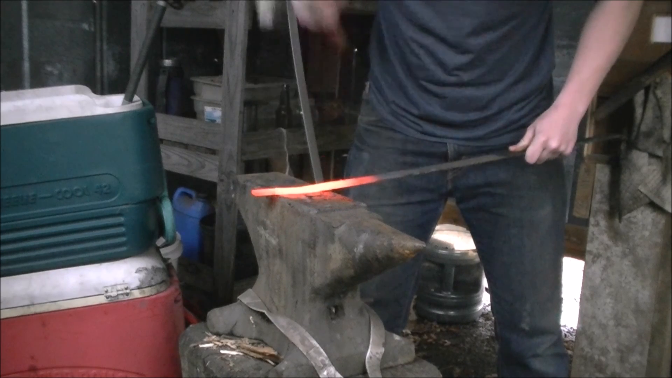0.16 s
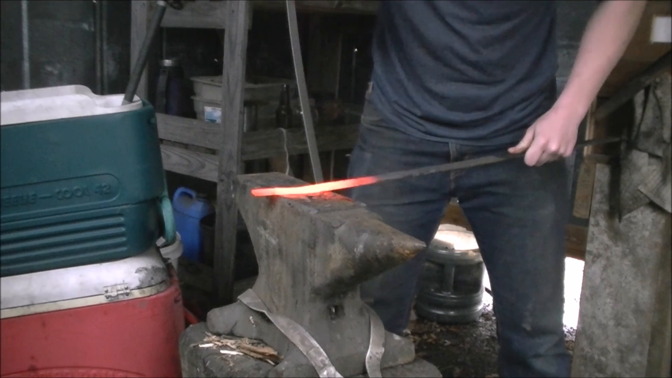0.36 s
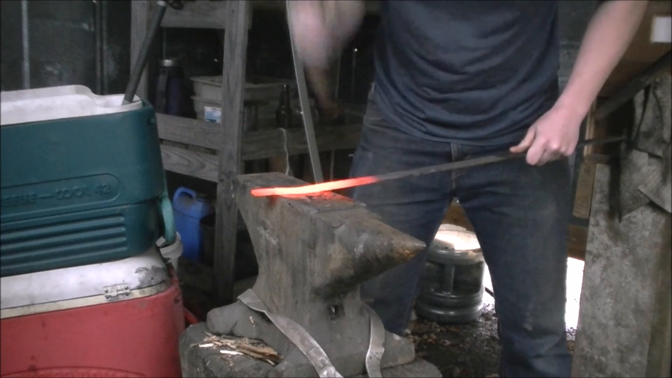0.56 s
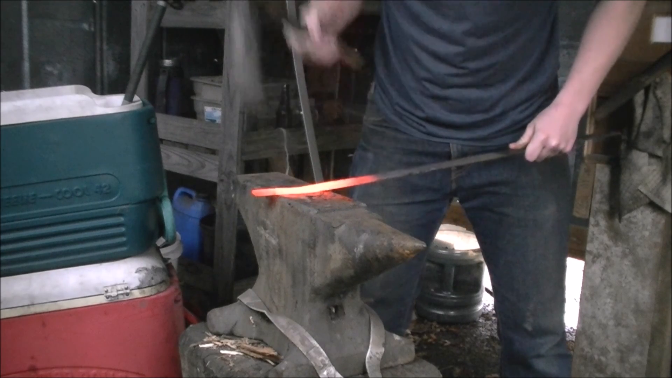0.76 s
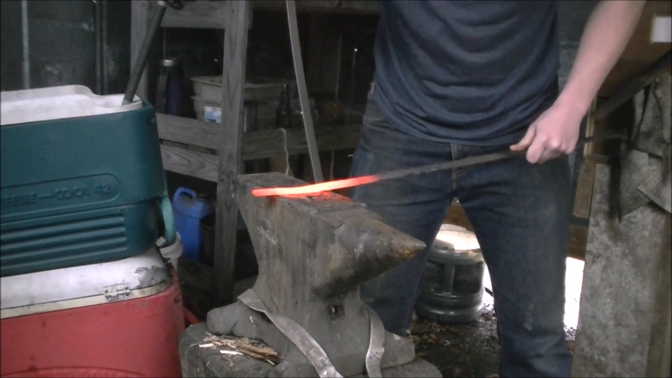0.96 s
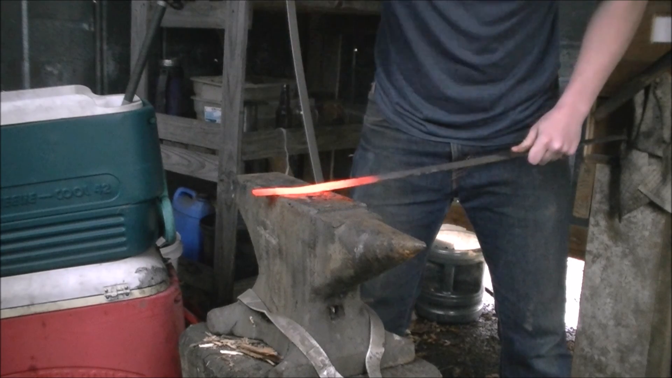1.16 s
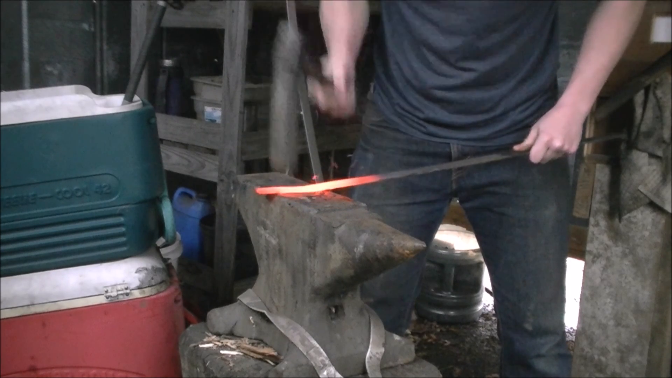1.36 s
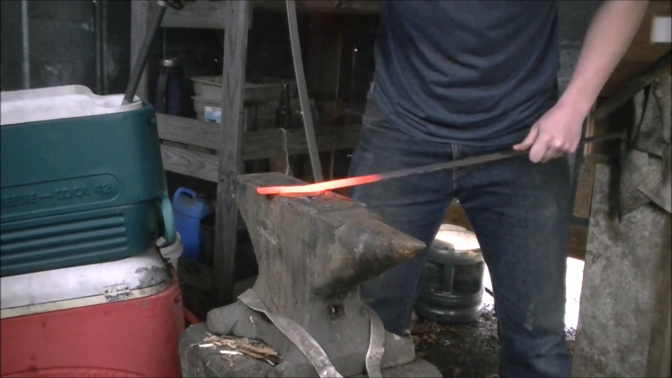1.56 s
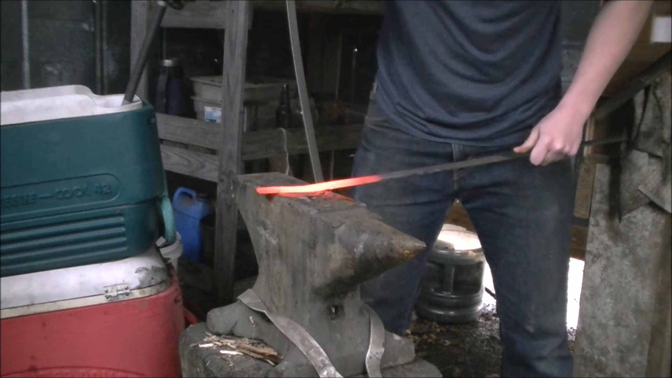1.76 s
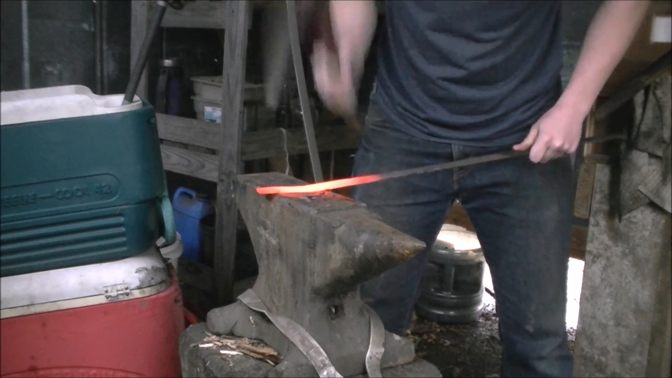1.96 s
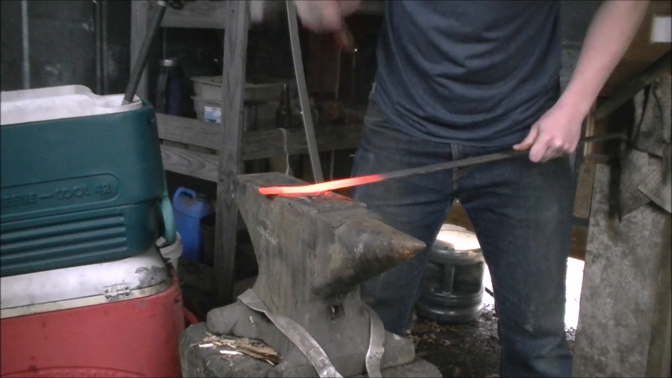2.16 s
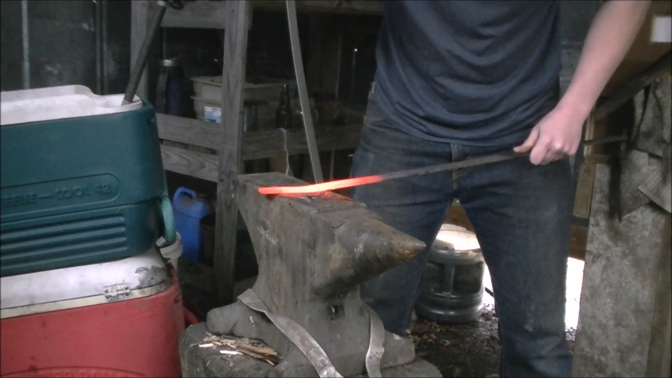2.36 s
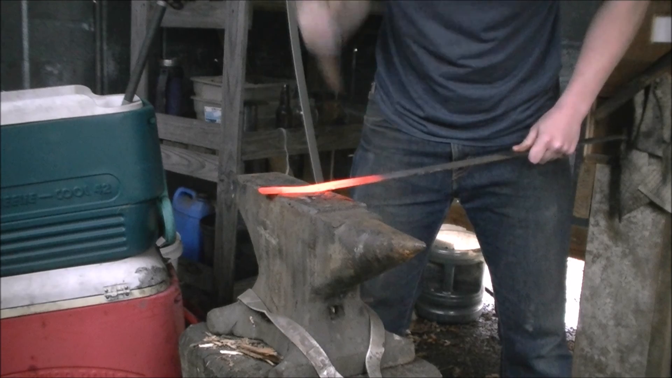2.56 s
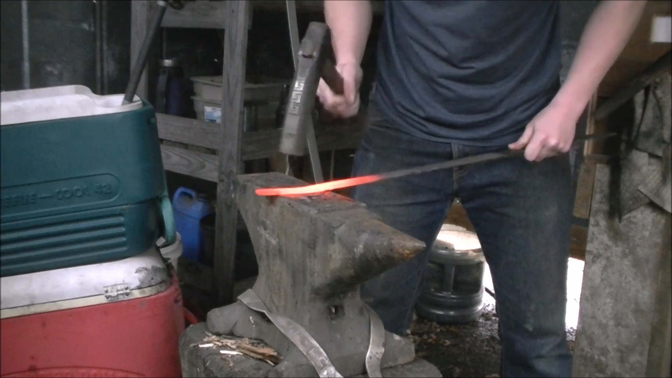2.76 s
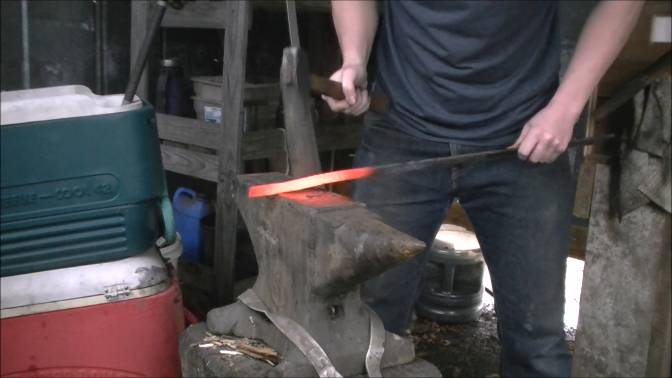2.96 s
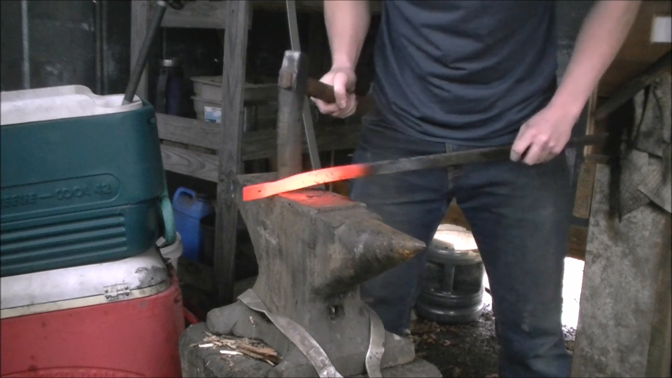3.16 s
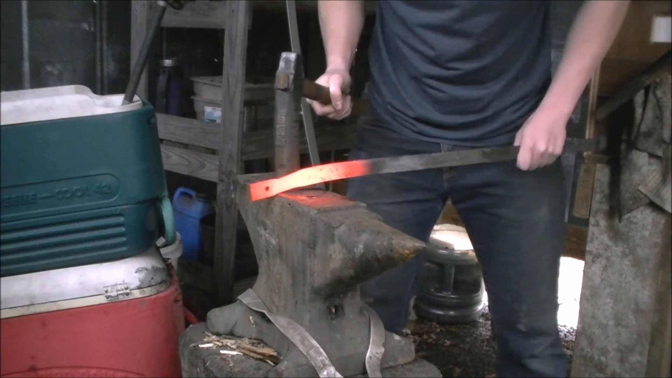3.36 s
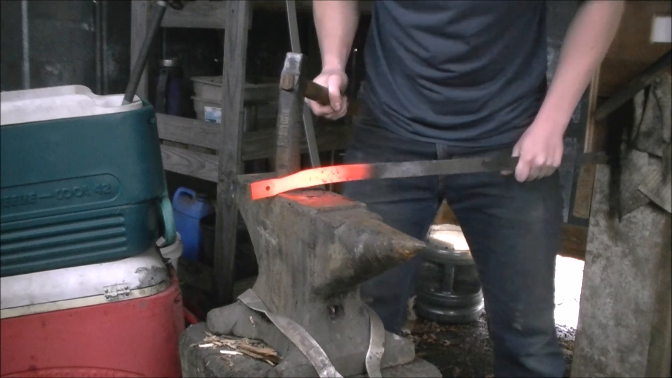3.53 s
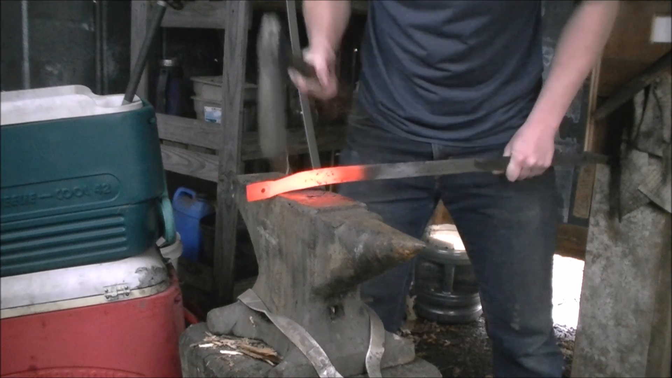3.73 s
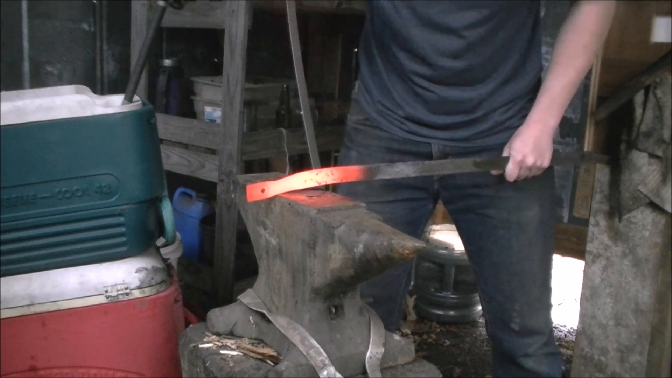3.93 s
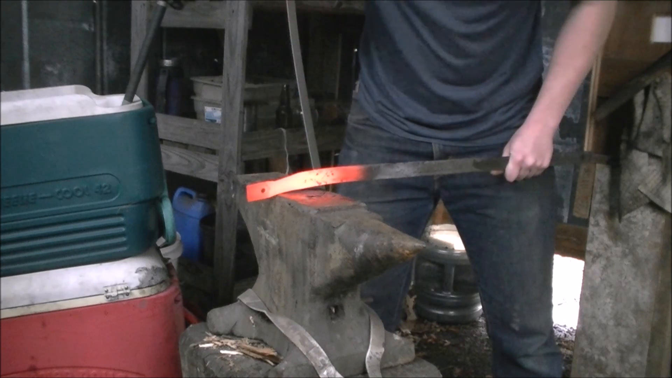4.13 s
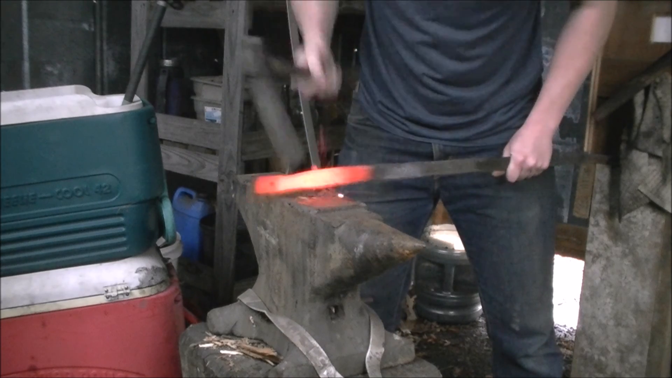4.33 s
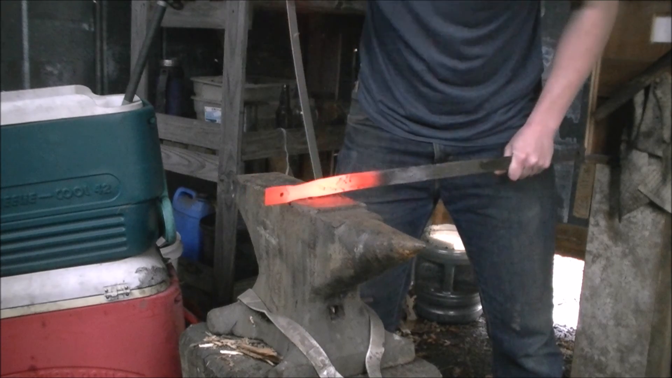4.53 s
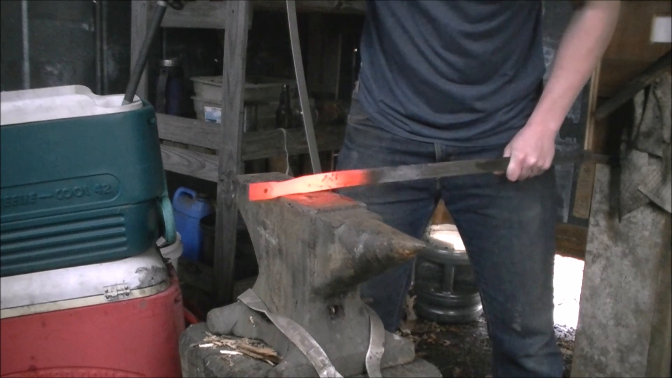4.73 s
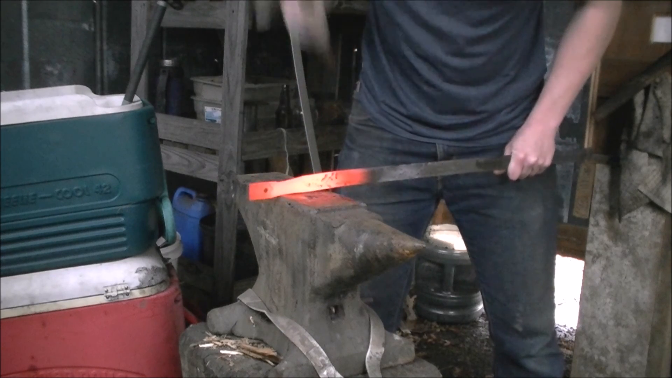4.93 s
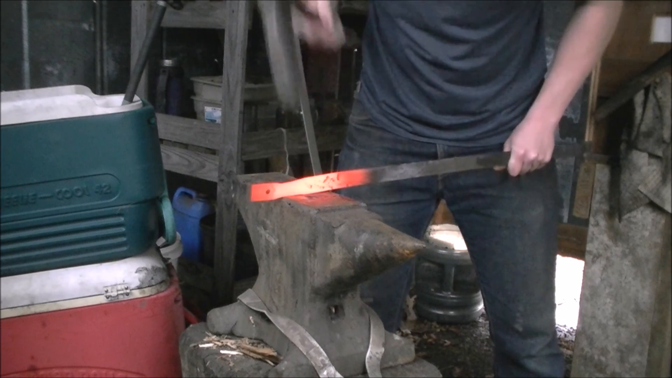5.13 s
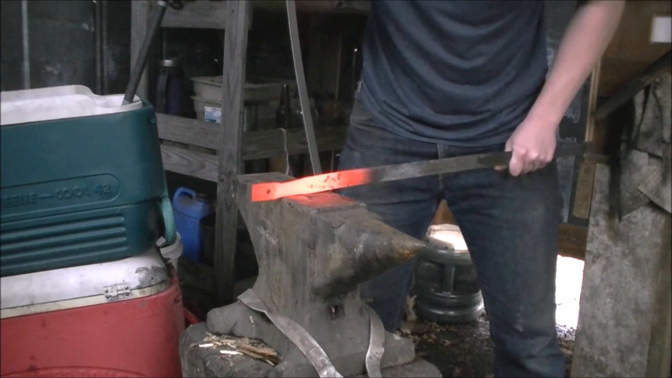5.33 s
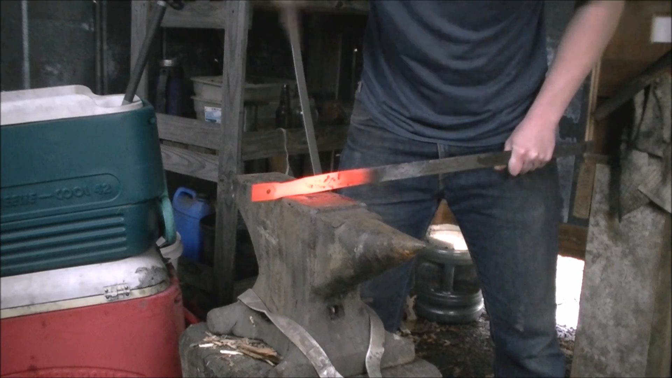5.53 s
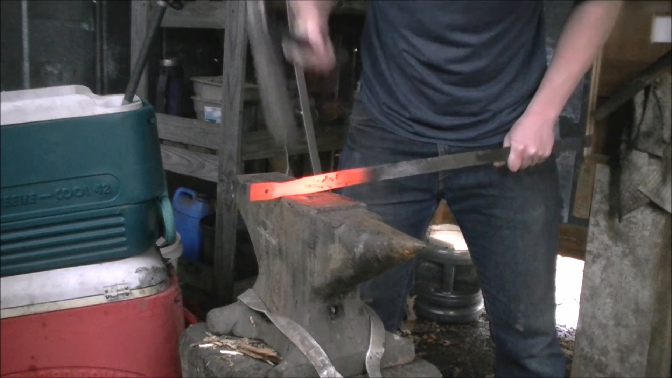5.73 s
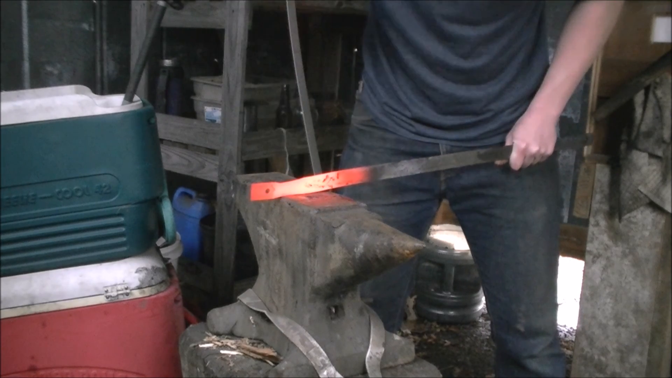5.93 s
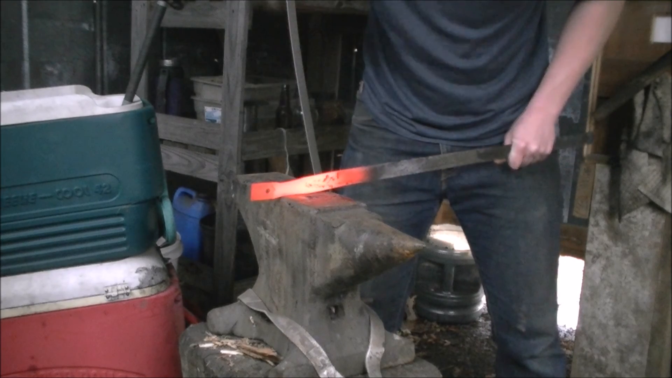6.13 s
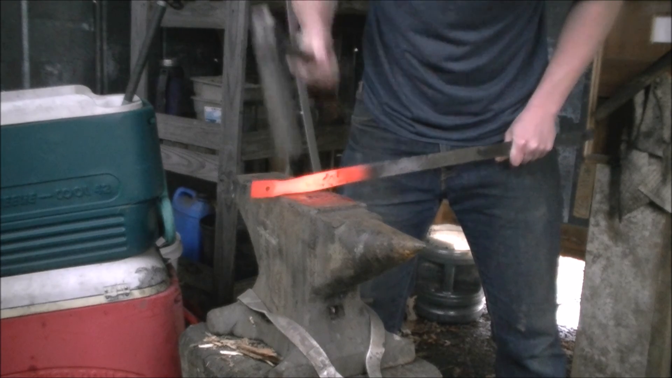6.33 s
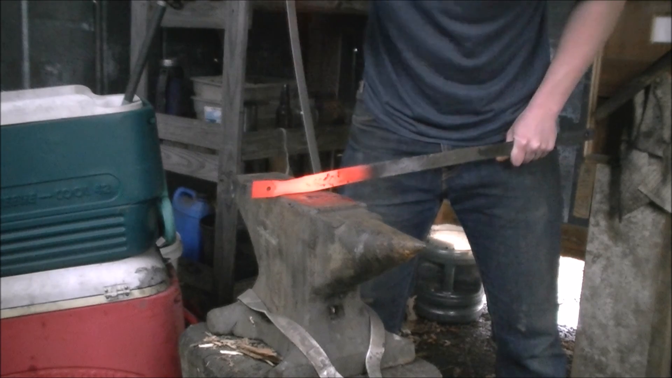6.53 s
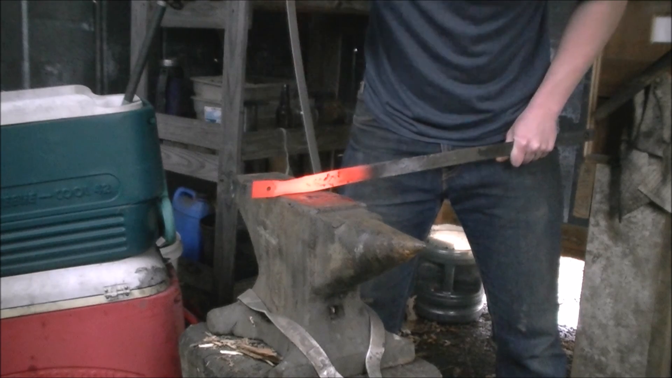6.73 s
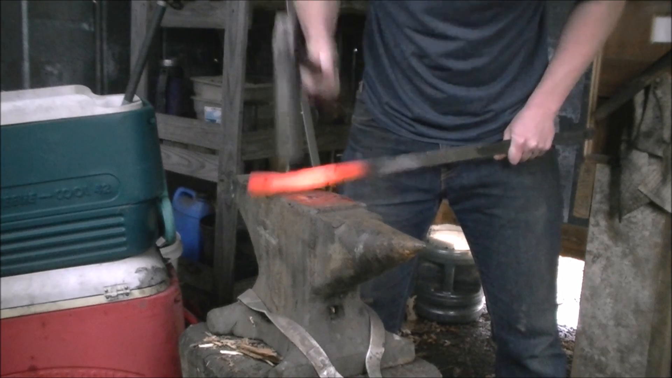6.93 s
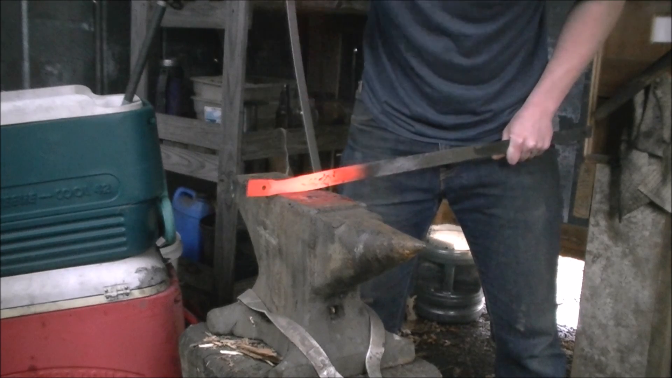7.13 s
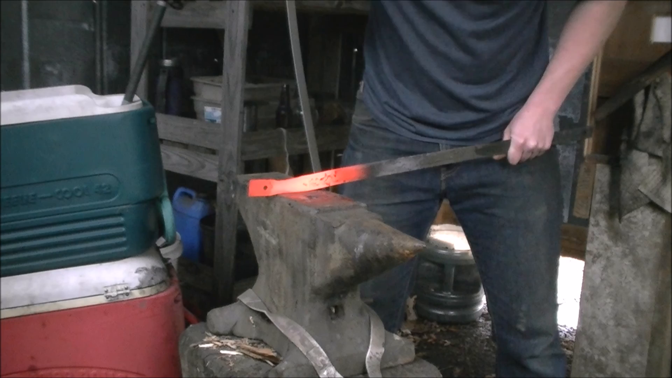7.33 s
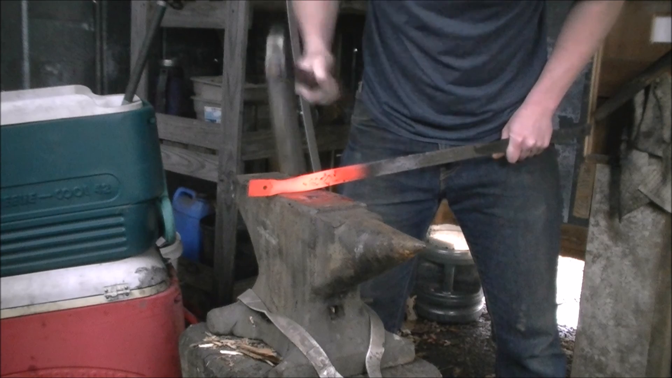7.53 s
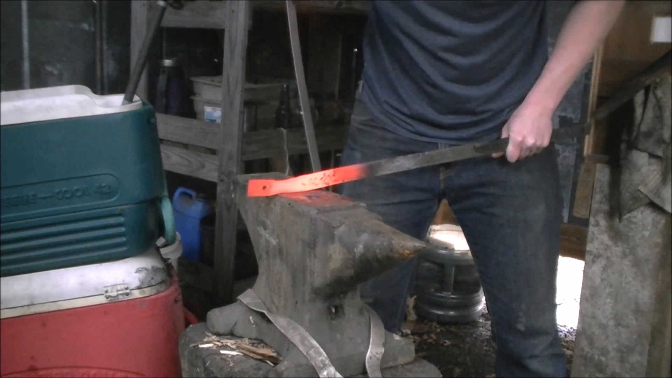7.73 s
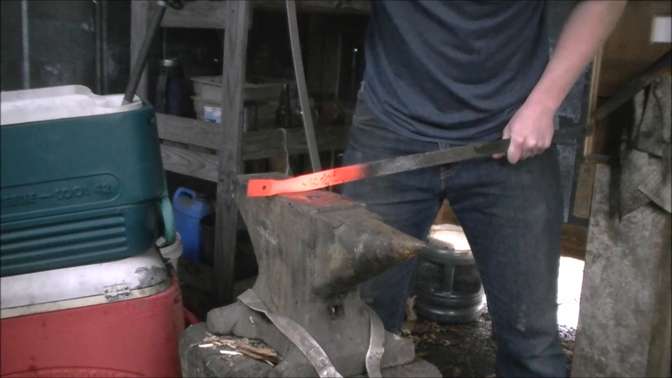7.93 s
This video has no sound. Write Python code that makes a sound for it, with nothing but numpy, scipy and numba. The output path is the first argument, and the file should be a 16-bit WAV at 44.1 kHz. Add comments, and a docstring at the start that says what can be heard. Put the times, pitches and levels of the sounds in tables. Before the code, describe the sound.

Blacksmith hammering at an anvil in an echoing workshop: steady hard metallic clangs, a short pause of bouncing taps, then more blows and distant bangs.

```python
"""In a forge, a smith draws out a hot bar: five blows, three idle taps on the bare anvil face, then six more blows.
Throughout, each blow is a noise crack, decaying sine modes of steel and the echoing shop; the lowest note sings on.
Between blows the bar scrapes in grains of noise and now and then clinks down.
In the second half three bangs arrive from further off as echoes alone; a low forge roar lies behind it all.
At the microphone, gain control lets the start of a hit overload, then ducks its ring."""
import sys
import numpy as np
from scipy import signal
from scipy.fft import rfft, irfft, next_fast_len
from scipy.io import wavfile
from numba import njit

SR = 44100
rng = np.random.default_rng(int(sys.argv[2]) if len(sys.argv) > 2 else 0)


def unload_audio(sound):
    """Save the sound as a 16-bit wav file, at the path given as the first command line argument."""
    columns = np.transpose(np.atleast_2d(sound))
    # keep every value between -1 and 1, then stretch to whole-number steps
    steps = np.round(np.clip(columns, -1, 1) * 32767)
    wavfile.write(sys.argv[1], SR, steps.astype(np.int16))


N = 356769
TAIL = SR  # samples that a hit is followed for
T = np.arange(TAIL) / SR

# hammer blows: t/s, what is struck, force/dB, spot along the face (about -1 to 1)
# the bar lies "flat", "askew" while it is being turned, or on "edge"; a "tap" meets the bare anvil
BLOWS = [ (.004, "flat", -5, -1), (0.658, "flat", -5, 0.41), (1.344, "flat", -0.5, -0.3),
         (2.022, "flat", -1.5, 0.98), (2.672, "flat", -5.5, -0.44), (2.952, "tap", -7, 1.6),
         (3.169, "tap", -7.5, -1.03), (3.263, "tap", -17, -1.2), (4.320, "askew", -10, 1.3),
         (5.021, "edge", -5, -.1), (5.666, "edge", -5.5, 0.29), (6.299, "edge", -5.5, 0.69),
         (6.912, "flat", -2, -0.45), (7.547, "edge", -9.5, -.9)]
# kinds of contact: name -> crack level/dB at t = 0, brightness/(dB per octave)
CONTACTS = {"flat": (-2.5, 0), "askew": (4.7, 1), "edge": (-0.514, -.1), "tap": (-7.5, -4)}
# modes of anvil, hammer and stump: f/Hz, t60/s (before a tap damps it),
# then relative level/dB with the bar flat, with the bar on edge, on the bare face
STEEL_MODES = [ (228.4, 0.41, -38, -32, -27.5), (256.7, 0.14, -26, -18, -23),
               (321.6, 0.12, -35, -24.5, -14.5), (396.8, 0.066, -22, -16.5, -23),
               (600, 0.0048, -32, 2, -25), (1041, 0.084, -19.5, -39, -15.5), (1514, 0.07, -19, -14, -7.5),
               (2040, 1.75, -51, -40.5, -37), (2093, 0.19, -37.5, -44, -15),
               (2207, 0.23, -23.5, -12.5, -19.5), (2332, 0.079, -10, -14, -9.5),
               (2892, 0.093, -14, -26, -9), (2938, 0.33, -24, -24, -12), (3346, 0.045, -16.5, -7.5, -11),
               (4270, 0.086, -20, -18.5, -16), (4790, 0.072, -15, -21, -14), (4905, 0.1, -22, -18, -19),
               (5400, 0.068, -27, -40.5, -33), (5680, .08, -22.5, -45, -30), (5900, 0.13, -23, -41, -18),
               (6316, 0.047, -15.5, -7, -17), (6860, 0.078, -14.5, -15, -10), (7060, 0.09, -22, -16, -25),
               (7180, 0.11, -15, -12.5, -34), (8250, 0.066, -24, -10.5, -38.5),
               (9270, 0.078, -19, -10.5, -25), (8500, 0.028, -12.5, -6, -20),
               (11970, 0.051, -17.5, -15, -49)]
# steel modes that depend most on where the blow lands: f/Hz, t60/s (before a tap damps it),
# relative level/dB flat, on edge, bare face, loudest spot, loss/dB one unit away from it
SPOT_MODES = [(3673, 0.16, -3, -7, -0.5, 0.96, 3), (3878, 0.076, -1, -5, 1.5, -1.2, 0.42),
              (9080, 0.13, -4, -7, -9, 0, 9)]
# colour of the crack before its brightness tilt: f/Hz, level/(dB per Hz)
CRACK_COLOUR = [(60, -27.5), (200, -14.5), (400, 1.5), (1000, 4), (2200, 6), (3000, -6), (5000, -1),
                (7500, 8), (10000, -3.5), (13000, -10), (16000, -36)]
# colour of the shop's answer before its brightness tilt: f/Hz, level/(dB per Hz)
SHOP_COLOUR = [(50, -16), (130, -6), (230, -2.5), (330, -18), (600, 1.5), (1000, 3.5), (1400, -4),
               (2000, -4.5), (3500, -2), (5000, -7), (8500, -7), (11000, -11.5), (14000, -56)]
# decay of the shop's echoes, stretched for the far bangs: f/Hz, t60/s
SHOP_T60 = [(100, 0.38), (400, 0.71), (1000, 0.58), (3500, 0.5), (8000, 0.38), (15000, 0.21)]
# the singing note where a blow starts it: what is struck -> level/dB
SING_LEVELS = {"flat": -26.5, "askew": -38, "edge": -25.5}
# longer drags of the bar over the face: t/s, length/s, level/dB, brightness/(dB per octave)
DRAGS = [(1.66, 0.39, -58.5, -2), (2.369, 0.55, -58.5, 3), (3.416, .26, -59, -3), (4.766, 0.31, -52, -1.5)]
# the bar slid into place as the hammer comes down: how it lies -> level/dB
NUDGE_LEVELS = {"flat": -61.5, "edge": -53.5}
# colour of the crunching scale before its brightness tilt: f/Hz, level/(dB per Hz)
SCALE_COLOUR = [(300, -10.5), (1500, -1.5), (3000, -1), (5500, 0.5), (8500, 6), (11000, 3), (15000, -8.5)]
# small clinks of the bar: t/s, tick level/dB, brightness/(dB per octave), ring level/dB
CLINKS = [(0.579, -40.5, 2, -71), (4.119, -48.5, 12.5, -82), (4.652, -40, 2.5, -42.5),
          (5.655, -33, -11.5, -47)]
# colour of a clink's tick before its brightness tilt: f/Hz, level/(dB per Hz)
CLINK_COLOUR = [(200, -24), (1200, -7.5), (2500, -3), (4000, -10), (6000, -13), (9000, -17.5), (15000, -44)]
# modes of the loose bar: f/Hz, t60/s, relative level/dB
BAR_MODES = [(313, 0.32, -2.5), (1430, 0.097, 1), (1975, 0.13, 2), (2430, .12, 4.5), (2760, 0.13, 3),
             (3970, .1, -4), (4930, .08, -17)]
# bangs from further off: t/s, level/dB, time constant of the rise/s
BANGS = [(5.274, -18.5, 0.014), (6.212, -21, 0.013), (6.533, -21, 0.018)]
# colour of the bangs: f/Hz, level/(dB per Hz)
BANG_COLOUR = [(60, -39), (200, -5.5), (450, -3), (700, 0), (1200, 2), (2300, -3), (4000, -10),
               (8000, -11.5), (11000, -18.5), (15000, -41)]
# colour of the forge fire and the air of the shop: f/Hz, level/(dB per Hz)
FORGE_COLOUR = [(20, -10), (35, -15.5), (55, 1), (100, 0.5), (160, -3.5), (400, -6), (1000, -3.5),
                (1600, -13), (3000, -21.5), (5000, -25.5), (8500, -25), (12000, -34), (16000, -42)]
# stereo spread of every noise: f/Hz, side minus mid level/dB
SIDE_LEVELS = [(60, -11.5), (250, -10), (600, -11.5), (1200, -9), (4000, -6.5), (9000, 0.5)]

HARDEN_DB_PER_S = 1.57  # the cooling bar hardens, so the crack grows with time
RING_DB, DULL_DB_PER_S = 1.4, 0.53  # the steel's ring at t = 0, and how it falls as the bar cools
CRACK_WIDTH = 0.62  # 0-1; the crack comes straight from the anvil, so it is narrower than the echoes
BOOM_HZ, BOOM_DB, BOOM_DELAY_S, BOOM_LENGTH_S = 235.6, -35, 0.14, 0.087
SING_HZ, SING_T60_S, TAP_CHOKE_DB = 682.1, 3.55, 2.6
NUDGE_LEAD_S, NUDGE_LENGTH_S, NUDGE_TILT_DB = 0.17, 0.21, -7.5  # tilt in dB per octave
TOP_HZ = 16300  # steep upper limit of the microphone chain


def hammering():
    """All blows at the anvil; a low boom swells up late after each one on a flat or edgewise bar."""
    out = np.zeros((2, N))
    swell = np.sin(np.pi * np.clip(T / BOOM_LENGTH_S, 0, 1)) ** 2
    boom = amp(BOOM_DB) * swell * np.sin(2 * np.pi * BOOM_HZ * T)
    for s, struck, force_db, spot in BLOWS:
        add(out, s, amp(force_db) * blow(s, struck, spot))
        if struck in ("flat", "edge"):
            add(out, s + BOOM_DELAY_S, boom[None])
    return out


def blow(s, struck, spot, crack_t60=0.017):
    """Steel meets steel: a short crack, the ringing modes and the answer of the shop."""
    crack_db, tilt_db = CONTACTS[struck]
    column = {"flat": 0, "askew": 1, "edge": 1, "tap": 2}[struck]
    modes = [(hz, t60, levels[column]) for hz, t60, *levels in STEEL_MODES]
    for hz, t60, *levels, best_spot, loss_db in SPOT_MODES:
        modes.append((hz, t60, levels[column] - loss_db * (spot - best_spot) ** 2))

    crack = noise(CRACK_COLOUR, TAIL, tilt_db) * fade(crack_t60)
    crack = amp(crack_db + HARDEN_DB_PER_S * s) * crack
    crack = narrow(crack, CRACK_WIDTH)
    shop = reverberation(SHOP_COLOUR, tilt_db) * (1 - fade(0.064))  # the echoes take time to build
    if struck == "tap":  # the hammer rests on the face and damps the ring to a short ping
        damped = [(hz, t60 * 0.62, db) for hz, t60, db in modes]
        body = ring(damped, wet_db=-4.0) + amp(-16.5) * shop
    else:
        ring_level = amp(RING_DB - DULL_DB_PER_S * s)
        body = ring_level * ring(modes, wet_db=2.5) + amp(-6.5) * shop
    return (crack + body) * (1 - fade(0.0019))  # soften the very onset


def ring(modes, wet_db, build_s=0.08, width=0.67):
    """Modes (f/Hz, t60/s, level/dB) die quickly in the steel; the walls keep them alive, beating and fluttering."""
    direct = np.zeros(TAIL)
    for hz, t60, db in modes:
        direct += amp(db) * np.sin(2 * np.pi * (hz * T + rng.random())) * fade(t60)
    walls = reverberation([(4000, 3.0), (9000, -2.5), (12000, 3.5)])  # f/Hz, level/(dB per Hz)
    walls = narrow(walls * (1 - fade(build_s)), width)
    energy = np.sum(walls ** 2) / 2  # mean of the two channels
    walls = walls * amp(wet_db) / np.sqrt(energy)
    return direct + signal.fftconvolve(walls, direct[None], axes=1)[:, :TAIL]


def singing():
    """The anvil's lowest note, a decaying sine: each blow on the bar sets its level anew, each tap damps it a little."""
    t = np.arange(N) / SR
    level = np.zeros(N)
    for s, struck, *_ in BLOWS:
        after = t >= s
        if struck == "tap":
            level[after] *= amp(-TAP_CHOKE_DB)
        else:
            level[after] = amp(SING_LEVELS[struck]) * fade(SING_T60_S, t[after] - s)
    return level * np.sin(2 * np.pi * SING_HZ * t)


def bar():
    """Brittle scale crunches in grains as the bar slides over the anvil; now and then the bar clinks down."""
    out = np.zeros((2, N))
    slides = list(DRAGS)
    for s, struck, *_ in BLOWS[1:]:
        if struck in NUDGE_LEVELS:
            slides.append((s - NUDGE_LEAD_S, NUDGE_LENGTH_S, NUDGE_LEVELS[struck], NUDGE_TILT_DB))
    for s, length, db, tilt_db in slides:
        n = int(length * SR)
        grains = amp(1.2 * walk(400, n) + 4.0 * walk(35, n))  # fine and coarse crunching
        swell = np.sqrt(np.hanning(n))
        add(out, s, amp(db) * noise(SCALE_COLOUR, n, tilt_db) * grains * swell)
    for s, db, tilt_db, ring_db in CLINKS:
        tick = noise(CLINK_COLOUR, TAIL, tilt_db) * (fade(0.014) + 0.5 * fade(0.69))
        add(out, s, amp(db) * tick + amp(ring_db) * ring(BAR_MODES, wet_db=-4.0))
    return out


def far_bangs():
    """Heavy knocks out of sight: only their swelling, clattering echoes reach the microphone."""
    out = np.zeros((2, N))
    for s, db, rise in BANGS:
        clatter = amp(0.47 * walk(120, TAIL))
        swell = 1 - np.exp(-T / rise)
        add(out, s, amp(db) * reverberation(BANG_COLOUR, stretch=1.23) * clatter * swell)
    return out


def forge():
    """The fire and the air of the shop: a low roar of noise, its level wandering slightly."""
    level_db = -49.0 + 0.23 * walk(4, N) + 1.7 * walk(9.1, N)
    return noise(FORGE_COLOUR, N) * amp(level_db)


def reverberation(colour, tilt_db=0, stretch=1):
    """Dense echoes of one hit: noise split into bands that each die at their own pace, the top one fastest."""
    spectrum = rfft(noise(colour, TAIL, tilt_db))
    hz = np.arange(spectrum.shape[1]) * SR / TAIL
    centres, t60s = np.transpose(SHOP_T60)
    echoes = np.zeros((2, TAIL))
    for pick, t60 in zip(np.eye(len(centres)), t60s):
        share = along(np.transpose([centres, pick]), hz)  # bands crossfade from centre to centre
        echoes += irfft(spectrum * share, TAIL) * fade(t60 * stretch)
    return echoes


def noise(colour, size, tilt_db=0):
    """Coloured stereo noise, mid of rms about 1, tilted about 2 kHz; left and right differ most in the treble."""
    n = next_fast_len(size, True)
    hz = np.arange(n // 2 + 1) * SR / n
    octaves = np.log2(np.maximum(hz / 2000, 1 / 4))  # the tilt levels off below 500 Hz
    gain = amp(along(colour, hz) + tilt_db * octaves)
    mid, side = rfft(rng.standard_normal((2, n))) * gain / np.sqrt(np.mean(gain ** 2))
    side = side * amp(along(SIDE_LEVELS, hz))
    return irfft(np.array([mid + side, mid - side]), n)[:, :size]


def narrow(stereo, width):
    """Draw left and right towards their mean; width 1 leaves them apart, 0 gives mono."""
    return width * stereo + (1 - width) * stereo.mean(axis=0)


def walk(rate, size):
    """Random wander with a spread near 1, in straight lines between `rate` random points per second."""
    knots = rng.standard_normal(int(size / SR * rate) + 2)
    return 1.2 * np.interp(np.arange(size) / SR * rate, np.arange(len(knots)), knots)


def fade(t60, t=T):
    """Exponential decay of 60 dB in t60."""
    return np.exp(-np.log(1000) * t / t60)


def amp(db):
    """Amplitude factor of a level in dB."""
    return 10 ** (np.asarray(db) / 20)


def along(points, hz):
    """Read (f/Hz, value) points on a log-frequency axis."""
    f, value = np.transpose(points)
    return np.interp(np.log(hz + 1), np.log(f), value)


def add(out, s, sound):
    """Mix a sound in at a time in seconds."""
    i = max(int(s * SR), 0)
    out[:, i:i + sound.shape[1]] += sound[:, :N - i]


def scene():
    """The shop from the anvil outwards to the fire."""
    return hammering() + singing() + bar() + far_bangs() + forge()


@njit
def follow(x, attack, release):
    """Envelope that rises fast and falls more slowly."""
    out, e = np.empty(len(x)), 0.
    for i in range(len(x)):
        e += (x[i] - e) * (attack if x[i] > e else release)
        out[i] = e
    return out


def record(dry, threshold_db=-23, ratio=6, attack_s=0.013, release_s=0.02):
    """Gain control lets the first milliseconds overload, then ducks the ring and swells back as it dies."""
    envelope = follow(np.abs(dry).mean(axis=0), 1 / (attack_s * SR), 1 / (release_s * SR))
    gain = np.maximum(envelope / amp(threshold_db), 1) ** (1 / ratio - 1)
    rounded = 0.8 * np.tanh(dry * gain / 0.8)  # soft overload
    band = signal.butter(3, [42, 14000], "bandpass", fs=SR, output="sos")
    top = signal.ellip(10, 0.2, 80, TOP_HZ, fs=SR, output="sos")
    return signal.sosfilt(top, signal.sosfilt(band, rounded))


dry = scene()
out = record(dry)
unload_audio(out)
```